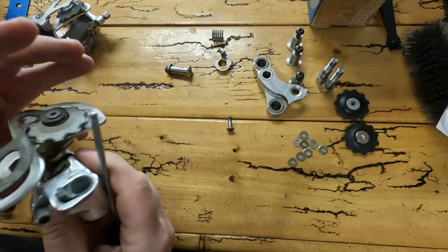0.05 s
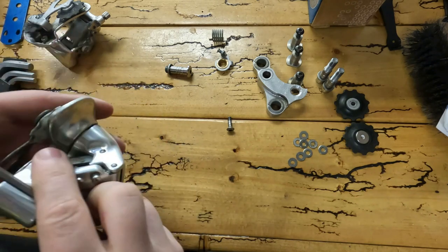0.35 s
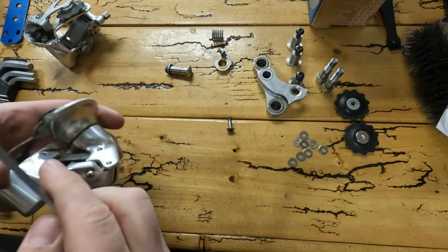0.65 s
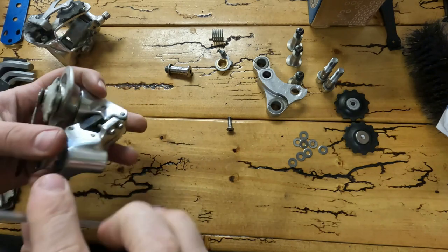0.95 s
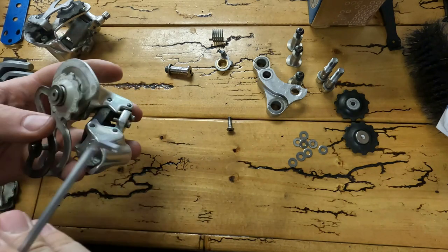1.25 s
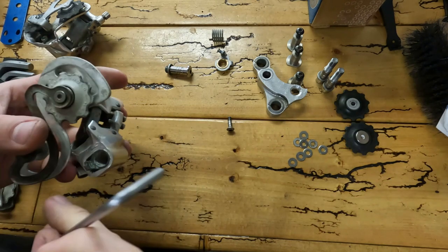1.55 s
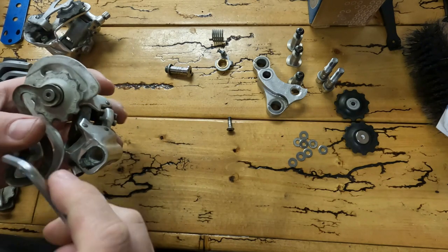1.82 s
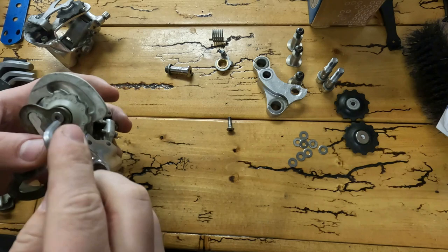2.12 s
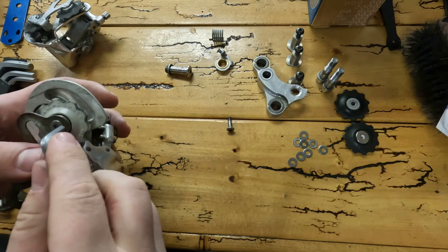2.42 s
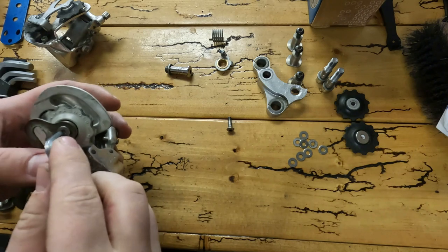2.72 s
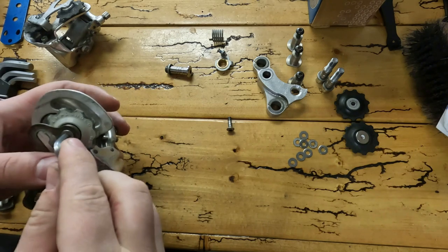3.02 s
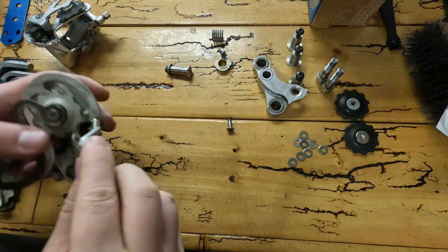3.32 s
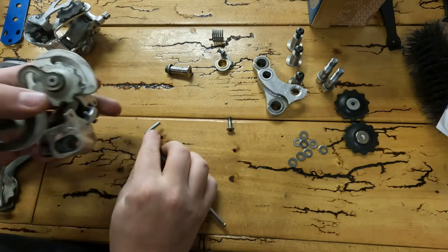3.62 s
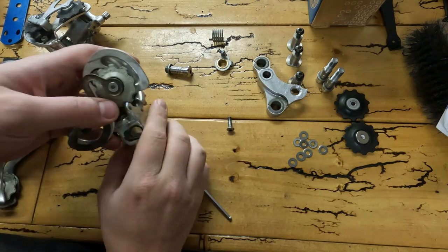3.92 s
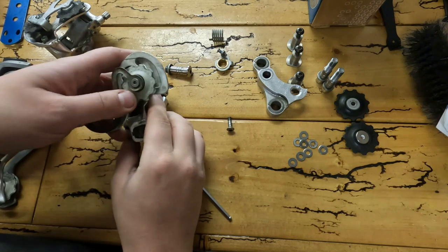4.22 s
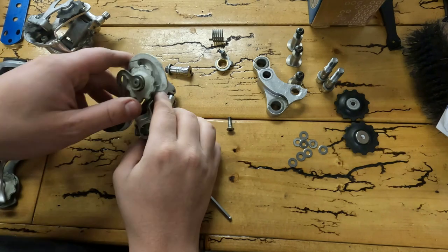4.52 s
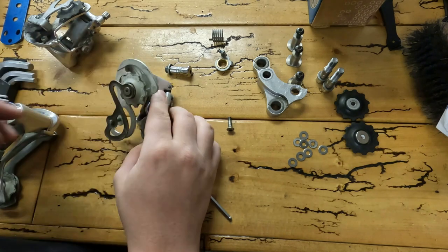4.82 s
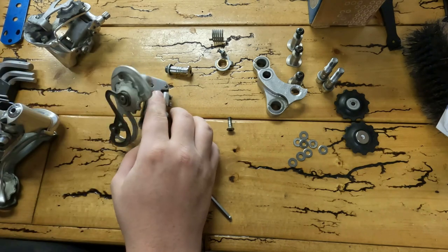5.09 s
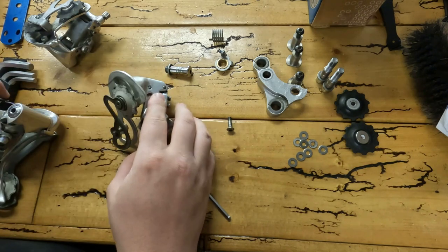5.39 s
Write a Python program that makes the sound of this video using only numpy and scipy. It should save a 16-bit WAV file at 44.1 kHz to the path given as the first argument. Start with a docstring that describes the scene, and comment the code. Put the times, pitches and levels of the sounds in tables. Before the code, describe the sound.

Small metal clicks from a hex key and bicycle part, then the key clatters onto a wooden bench and the part thumps down.

```python
"""Bicycle derailleur on a workbench

Close up in a small room, the sprung cage snaps against its stop and a hex key ticks and grates in a bolt.
The steel key knocks on the wooden bench, drops flat and rocks to rest, ringing. The derailleur thumps
down, skids and tips over, and the boards boom. Hands and sleeves rustle over a low room rumble."""
import sys
import numpy as np
from scipy import signal
from scipy.fft import rfft, irfft
from scipy.io import wavfile
from scipy.ndimage import uniform_filter1d

SR = 44100
rng = np.random.default_rng(int(sys.argv[2]) if len(sys.argv) > 2 else 0)


def dump_mix(stems):
    """Bounce the given channels to the path in sys.argv[1] as a 16-bit WAV at rate SR."""
    frames = np.atleast_2d(stems).T  # one column per channel
    limited = np.clip(frames, -1, 1)  # hard clip at full scale
    pcm = np.round(limited * 32767).astype(np.int16)
    wavfile.write(sys.argv[1], SR, pcm)


N = 244755
TIME = np.arange(N) / SR


def amp(db):
    """Decibels to gain."""
    return 10 ** (np.asarray(db) / 20)


def unit(x):
    """Scale to unit rms."""
    return x / np.sqrt(np.mean(x ** 2) + 1e-20)


def curve(points, hz):
    """Interpolate (freq_hz, value) rows on a log-frequency axis."""
    freq_hz, value = np.transpose(points)
    return np.interp(np.log(hz + 1), np.log(freq_hz + 1), value)


def stroke(rows, rise_share, fall_s):
    """Swell-hold-decay gain from (start_s, length_s, level_db) rows, summed in power."""
    power = np.zeros(N)
    for start_s, length_s, level_db in rows:
        attack = np.clip((TIME - start_s) / (rise_share * length_s), 0, 1)
        release = np.exp(-np.maximum(TIME - start_s - length_s, 0) / fall_s)
        power += (amp(level_db) * attack * release) ** 2
    return np.sqrt(power)


def fade_in(x, rise_s):
    """Exponential onset."""
    return x * (1 - np.exp(-TIME[:x.shape[-1]] / rise_s))


def add(mix, start_s, sound):
    """Mix a sound in at start_s."""
    part = mix[max(round(start_s * SR), 0):][:len(sound)]
    part += sound[:len(part)]


def convolve(x, response):
    """Filter by a mono or stereo response; one row per channel."""
    return signal.fftconvolve(np.atleast_2d(x), np.atleast_2d(response), axes=1)[:, :N]


def pan(x, left_db):
    """Set the left channel left_db above the right."""
    return x * amp([[left_db / 2], [-left_db / 2]])


def ports(x, spread):
    """Near reflections reach the two microphone ports differently, except in the bass."""
    t = TIME[:SR // 200]
    echoes = rng.standard_normal(len(t)) * np.exp(-t / 0.0018)
    phases = np.exp(1j * np.angle(rfft(echoes)))
    bass_cut = np.minimum(np.fft.rfftfreq(len(t), 1 / SR) / 1200, 1)
    side = spread * convolve(x, irfft(phases * bass_cut))[0]
    return np.array([x + side, x - side])


def click(spectrum, tilt_db_oct=0, size=2048):
    """Minimum-phase pulse of unit peak; its spectrum is tilted above 300 Hz."""
    hz = abs(np.fft.fftfreq(size, 1 / SR))
    log_gain = np.log(amp(curve(spectrum, hz) + tilt_db_oct * np.log2(np.maximum(hz, 300))))
    pulse = np.fft.ifft(np.exp(np.conj(signal.hilbert(log_gain)))).real[:size // 2]
    return pulse / abs(pulse).max()


def contact(spectrum, tilt_db_oct, rough, rough_s):
    """A click drawn out by micro-bounces of random sign."""
    t = TIME[:SR // 40]
    chatter = rng.choice([-1, 1], len(t)) * np.exp(-t / rough_s)
    force = rough * chatter / np.linalg.norm(chatter)
    force[0] = 1
    return signal.fftconvolve(force, click(spectrum, tilt_db_oct))


def ring(modes, pitch_ratio=1, scatter_db=0):
    """Decaying sines; their levels scatter with the spot struck."""
    t = TIME[:int(SR * max(t60_s for _, _, t60_s in modes))]
    offsets_db = scatter_db * rng.standard_normal(len(modes))
    return sum(amp(level_db + offset_db - 60 * t / t60_s) * np.sin(2 * np.pi * hz * pitch_ratio * t)
               for (hz, level_db, t60_s), offset_db in zip(modes, offsets_db))


def friction(spectrum, slips_per_s, spread_db):
    """Steady stream of tiny random slips, unit rms."""
    sizes = amp(spread_db * np.minimum(rng.exponential(1, N), 3))
    signs = rng.choice([-1, 1], N)
    slipping = rng.random(N) < slips_per_s / SR
    return unit(convolve(sizes * signs * slipping, click(spectrum))[0])


def bounces(runs, per_s, fade_db_per_s, scatter_db=1.5):
    """Yield (start_s, level_db) for each bounce of uneven, fading runs."""
    for start_s, length_s, level_db in runs:
        for k, (late, strong) in enumerate(rng.standard_normal((40, 2))):
            if k / per_s < length_s:
                faded_db = level_db - fade_db_per_s * k / per_s
                yield start_s + (k + 0.2 * late) / per_s, faded_db + scatter_db * strong


def tail(decay, colour, correlation, rise_s):
    """Diffuse stereo response of unit energy; each band decays at its own rate."""
    mid, side = rng.standard_normal((2, SR))
    side *= np.sqrt((1 - correlation) / (1 + correlation))
    hz, t, bands = signal.stft([mid + side, mid - side], SR, nperseg=256)
    bands *= amp(curve(colour, hz)[:, None] - 60 * t / curve(decay, hz)[:, None])
    response = fade_in(signal.istft(bands, SR, nperseg=256)[1][:, :SR], rise_s)
    return response / np.linalg.norm(response[0])


def room_noise():
    """Low room rumble under a faint hiss."""
    # noise shape: freq_hz, gain_db
    spectrum = [(12, -26), (22, -2), (36, -6), (50, -10.5), (68, -28.5), (125, -25), (170, -25.5),
                (220, -23), (300, -31), (600, -44), (1400, -47.5), (3600, -61), (12000, -64),
                (16000, -81.5)]
    # left-right likeness: freq_hz, correlation
    likeness = [(30, 0.9), (120, 0.89), (400, 0.82), (1500, 0.2), (5000, 0.13), (14000, 0.16)]
    hz = np.fft.rfftfreq(N, 1 / SR)
    left, independent = rfft(rng.standard_normal((2, N)))
    correlation = curve(likeness, hz)
    right = correlation * left + np.sqrt(1 - correlation ** 2) * independent
    noise = irfft(np.array([left, right]) * amp(curve(spectrum, hz)), N)
    return pan(amp(-47) * unit(noise), left_db=-1)


def room_echo(send):
    """Small-room reverberation; the treble dies first."""
    # reverberation time: freq_hz, t60_s
    decay = [(150, 0.59), (1000, 0.6), (3000, 0.6), (7000, 0.47), (14000, 0.24)]
    # echo colour: freq_hz, gain_db
    colour = [(100, 4), (1500, 4), (3000, -3.5), (7000, -3), (14000, 3)]
    return convolve(send, tail(decay, colour, correlation=0.41, rise_s=0.0082))


def bench_sway():
    """The bench sways with a deep rumble as the arms bear down on the key."""
    # pushes: start_s, length_s, level_db
    sways = [(2.41, 0.098, -39), (2.68, 0.13, -41), (3.18, 0.061, -39)]
    band = signal.butter(3, [18, 42], "bandpass", fs=SR, output="sos")
    rumble = unit(signal.sosfilt(band, rng.standard_normal(N)))
    return rumble * stroke(sways, rise_share=0.2, fall_s=0.055)


def cloth_squeaks():
    """Fine weave drawn over an edge sings a thin note that rises and falls with the arm's speed."""
    # squeaks: start_s, length_s, level_db, top_hz
    notes = [(1.02, .39, -67, 13100), (3.53, 0.41, -62, 12600)]
    out = np.zeros(N)
    for start_s, length_s, level_db, top_hz in notes:
        progress = np.clip((TIME - start_s) / length_s, 0, 1)
        wobble, jitter, catch = (unit(uniform_filter1d(rng.standard_normal(N), size))
                                 for size in (1500, 12, 1100))
        grip = np.maximum(0.87 + 0.45 * catch, 0)  # the note catches and lets go
        hz = top_hz * (1 - 0.1 * (2 * progress - 1) ** 2 + 0.012 * wobble + 0.015 * jitter)
        swell = np.sqrt(np.sin(np.pi * progress))
        out += amp(level_db) * grip * swell * np.sin(2 * np.pi * np.cumsum(hz) / SR)
    return out


def hands():
    """Soft friction: sleeves drag, a hand brushes the bench top, a forearm rubs its edge."""
    # sleeve drags: start_s, length_s, rustle_db, fizz_db
    drags = [(0.081, 0.15, -68, -90), (0.296, 0.092, -67, -82), (0.462, .12, -72.5, -80),
             (.57, 0.098, -64, -85), (0.707, 0.35, -63.5, -73), (1.032, 0.26, -60.5, -71),
             (1.313, 0.3, -82, -74.5), (1.736, 0.3, -67.5, -67), (2.023, .24, -57.5, -70),
             (2.396, 0.88, -80.5, -105), (3.149, 0.28, -61, -78), (3.703, 0.49, -55.5, -80),
             (4.312, 0.18, -62, -93), (4.414, 0.39, -63, -71.5), (4.769, 0.12, -54.5, -64),
             (4.975, 0.24, -64.5, -76)]
    # hand and forearm strokes: start_s, length_s, level_db
    brushes = [(3.38, .16, -51.5), (3.54, .16, -48)]
    rubs = [(1.2, 0.061, -66.5), (2.02, .16, -57)]
    # friction spectra: freq_hz, gain_db
    rustle_spectrum = [(200, -0.5), (800, -1.5), (1500, 0), (2400, -0.5), (3700, -3), (5200, 0), (7000, -2),
                       (9000, -13), (12500, -18.5), (14000, -24), (16000, -40.5)]
    fizz_spectrum = [(3500, -26), (5200, 0.5), (7000, -0.5), (8800, -6.5), (11000, -3), (12500, 0),
                     (14000, -2), (16000, -13.5)]
    brush_spectrum = [(300, -4), (1200, -3), (3500, 3.5), (6500, 0.5), (9000, -9.5), (12500, -15),
                      (15000, -31)]
    rub_spectrum = [(200, -15), (420, -1.5), (520, 2), (630, 6.5), (800, -4.5), (1100, -27), (2500, -40),
                    (6000, -26)]
    rustle = friction(rustle_spectrum, slips_per_s=9000, spread_db=0.5)
    rustle *= stroke(np.array(drags)[:, [0, 1, 2]], rise_share=0.28, fall_s=0.041)
    fizz = friction(fizz_spectrum, slips_per_s=8200, spread_db=3.5)
    fizz *= stroke(np.array(drags)[:, [0, 1, 3]], rise_share=0.28, fall_s=0.041)
    brush = friction(brush_spectrum, slips_per_s=12000, spread_db=0)
    brush *= stroke(brushes, rise_share=0.38, fall_s=0.058)
    rub = friction(rub_spectrum, slips_per_s=3000, spread_db=1)
    rub *= stroke(rubs, rise_share=0.25, fall_s=0.06)
    return pan(rustle + fizz + cloth_squeaks() + brush + rub, left_db=4)


def bench_thumps():
    """Each blow gives a wooden knock; the boards boom on and shake what lies on them."""
    # blows: start_s, knock_db, pitch_ratio, boom_db
    blows = [(0.241, -44, 1.75, -78), (3.651, -51, 0.92, -33.5), (3.827, -54, 0.9, -31.5),
             (3.911, -53, 0.91, -30.5), (3.985, -43, 1, -38), (4.029, -27, 1.17, -42),
             (4.066, -50, .7, -34), (4.4708, -23.5, 1.18, -8), (4.555, -21.5, 0.4, -30),
             (4.881, -45, 0.49, -32.5), (5.1253, -34, 3, -23), (5.262, -15, 1.06, -19.5),
             (5.3948, -20, 1.2, -35), (5.439, -28.5, 1.7, -62)]
    # modes of the struck spot and of the boards: freq_hz, gain_db, t60_s
    spot_modes = [(216.5, 3, 0.045), (313, 3.5, 0.038), (395, -7.5, 0.059)]
    board_modes = [(97, -7, .5), (120, -9, .4), (157, -6, .45), (218, 0, .55), (301, -1, .4), (372, 0, .45),
                   (437, -4, .4)]
    # force pulse: freq_hz, gain_db
    push_spectrum = [(30, -26.5), (90, -6), (200, 2.5), (370, 1), (480, -5), (650, -12), (900, -18.5),
                     (1200, -21), (1600, -26.5), (2600, -28.5), (5000, -41.5), (12000, -79)]
    # diffuse shaking: freq_hz, t60_s
    shake_decay = [(100, 0.67), (260, 0.91), (700, 0.89), (1840, 0.96), (5000, 0.32)]
    shake_colour = [(60, 7.5), (110, 3), (250, -13), (450, -1), (1000, 0), (5000, 1)]  # freq_hz, gain_db
    knock, push = np.zeros((2, N))
    for start_s, knock_db, pitch_ratio, boom_db in blows:
        wood = ring(spot_modes, np.clip(pitch_ratio, 0.6, 1.8))
        add(knock, start_s, amp(knock_db - 3) * fade_in(wood, rise_s=0.002))
        add(push, start_s, amp(boom_db) * click(push_spectrum))
    plank_swing = ring([(120.6, -21.5, 0.15)])  # a hand lands on one plank
    add(knock, 3.829, fade_in(plank_swing, rise_s=0.015))
    force = push + amp(-7.5) * knock
    boards = ring(board_modes)
    boom = convolve(force, boards / np.linalg.norm(boards))
    shake = convolve(force, tail(shake_decay, shake_colour, correlation=0.95, rise_s=0.00095))
    return knock + amp(1.5) * push + amp(-22) * boom + amp(-1.5) * shake


def cage_snap():
    """The sprung cage chatters against its stop; each rough contact rings its plates."""
    # contacts: start_s, level_db
    snaps = [(0.0299, -13.5), (0.0303, -18.5), (0.0373, -21), (0.039, -20), (0.049, -32)]
    # plate modes: freq_hz, gain_db, t60_s
    plate_modes = [(2075, -20, .035), (2298, -18, .045), (2500, -15, .04), (2621, -9, .035),
                   (2680, -2, .02), (3799, -12, .015), (4350, -14, .012), (5492, -17, .11),
                   (5720, -11, .02), (6000, -7, .025), (6780, -8, .02), (7100, -9, .02), (7796, -14, .04),
                   (7887, -14, .03), (11700, -17, .02), (12039, -12, .028)]
    # contact tick: freq_hz, gain_db
    tick_spectrum = [(200, -22), (1000, -28), (2200, 0.5), (3200, -2.5), (4200, -1.5), (7000, -4.5),
                     (10000, -21), (15000, -23.5)]
    force, t = np.zeros(N), TIME[:SR // 100]
    for start_s, level_db in snaps:
        buzz = rng.choice([-1, 1], len(t)) * np.exp(-t / 0.0027)
        add(force, start_s, amp(level_db) * ((t == 0) + 0.35 * buzz / np.linalg.norm(buzz)))
    plates = amp(-5.5) * convolve(force, ring(plate_modes))[0]
    ticks = amp(-2.5) * convolve(force, click(tick_spectrum))[0]
    low_cut = signal.butter(3, 1800, "highpass", fs=SR, output="sos")  # small plates radiate no bass
    return pan(ports(signal.sosfilt(low_cut, plates + ticks), spread=0.25), left_db=2)


def key_in_bolt():
    """The hex key takes up its play in the socket, grates and slips out."""
    # turning and withdrawal: start_s, length_s, level_db
    grates = [(2.595, 0.024, -56), (2.66, 0.06, -56), (2.89, 0.041, -59), (3.38, 0.023, -34)]
    # ticks in the bolt head: start_s, level_db, tilt_db_oct
    ticks = [(1.722, -55.5, -12), (2.5459, -24.5, 3), (2.5462, -24.5, 8), (2.6, -46.5, -5),
             (2.7092, -52, -4), (2.897, -47, 2), (2.933, -51.5, -18), (3.379, -30, 5.5), (3.391, -27, 3),
             (3.3969, -18, -1), (3.4058, -23.5, 9.5)]
    # grate and tick spectra: freq_hz, gain_db
    grate_spectrum = [(500, -28), (1500, -17), (2200, -15), (2650, -4.5), (3300, -10), (4200, 6.5),
                      (5200, -5.5), (6500, -1.5), (8500, -20.5), (12000, -21), (15000, -22.5)]
    tick_spectrum = [(300, -41), (1000, -21.5), (1600, -9), (2200, -17), (2700, -0.5), (3400, -12.5),
                     (4200, 4), (5200, -4), (6500, -2), (8500, -16.5), (12000, -28), (15500, -40)]
    out = friction(grate_spectrum, slips_per_s=2400, spread_db=3.5)
    out *= stroke(grates, rise_share=0.47, fall_s=0.0074)
    for start_s, level_db, tilt_db_oct in ticks:
        add(out, start_s, amp(level_db) * contact(tick_spectrum, tilt_db_oct, rough=1.84, rough_s=0.001))
    return pan(ports(out, spread=0.25), left_db=-2)


def key_ring():
    """The steel key rings freely."""
    # free modes: freq_hz, gain_db, t60_s
    steel_modes = [(7817, -3, .6), (8387, -3, .3), (8877, -16, .2), (11440, -12, .28), (12032, -12, .28),
                   (12559, -20, .25), (15480, -23, .35)]
    return ring(steel_modes)


def key_knocks():
    """The held key bounces on its end; each knock is short and pitched, and the steel sings on."""
    # knocks on the boards: start_s, level_db, pitch_ratio, ring_db
    knocks = [(3.6477, -18.5, 1.02, -68), (3.6919, -30, 0.87, -70), (3.7158, -33, 0.83, -73.5),
              (3.827, -13.5, 1.024, -37), (3.8692, -17, 1.01, -39.5), (3.8959, -16, 1, -45.5),
              (3.9161, -22, 1.2, -50.5), (3.9504, -18, 1.1, -53)]
    # knock modes: freq_hz, gain_db, t60_s
    knock_modes = [(3170, 0, .015), (3320, -7, .01), (3640, -7, .011), (5100, -16, .008), (1750, -17, .015)]
    # dry crack of the wood: freq_hz, gain_db
    crack_spectrum = [(150, -8.5), (700, -12.5), (1500, 6), (2400, -10), (3300, -13), (5000, -5),
                      (7000, -20), (9500, -27), (12500, -18), (15000, -47)]
    held_hz, held_t60_s, release_s = 5448, 0.45, 3.911
    out, held = np.zeros((2, N))
    for start_s, level_db, pitch_ratio, ring_db in knocks:
        add(out, start_s, amp(level_db) * ring(knock_modes, pitch_ratio, scatter_db=1))
        add(out, start_s, amp(level_db - 14) * contact(crack_spectrum, 0, rough=3.8, rough_s=0.008))
        add(out, start_s, amp(ring_db - 13) * key_ring())
        add(held, start_s, amp(ring_db) * ring([(held_hz, 0, held_t60_s)]))
    held *= np.exp(-np.maximum(TIME - release_s, 0) / 0.008)  # wood damps this mode once the key is flat
    return pan(ports(out + held, spread=0.38), left_db=-0.5)


def key_clatter():
    """The released key drops flat, skids and rocks from end to end, ringing."""
    # main clacks: start_s, level_db, tilt_db_oct, ring_db
    clacks = [(3.9108, -6.5, 6.5, -40), (3.915, -24, -7.5, -62), (3.9233, -32.5, 3, -54.5),
              (3.9425, -18.5, 4.5, -54), (3.9505, -19, 4, -34), (3.9668, -14.5, 4, -67),
              (3.985, -13, 3.5, -38.5), (3.994, -26, 8, -39), (4.0143, -18, 1, -42.5),
              (4.018, -21, -3.5, -66), (4.0314, -18.5, 4, -40), (4.0483, -29, -1, -65),
              (4.0969, -25.5, -1, -59)]
    # rocking and skidding: start_s, length_s, level_db
    rocking = [(3.977, .11, -22)]
    skids = [(3.808, 0.038, -38.5), (3.965, 0.079, -32)]
    # key on wood: freq_hz, gain_db
    spectrum = [(100, -11), (300, -6), (750, -7.5), (1300, 4.5), (2000, -3.5), (2600, 4), (3600, 2),
                (5000, -0.5), (6500, -5.5), (8500, -21), (10500, -23), (13000, -32.5), (15500, -28.5)]
    # resonances of steel lying on the plank: freq_hz, gain_db, t60_s
    plank_modes = [(1264, -1, 0.048), (2470, -3.5, 0.16), (3240, -9, 0.041), (3550, -5.5, 0.065),
                   (3650, 2.5, 0.075), (3820, -10, 0.024), (4900, -2.5, .04), (5830, -11.5, .03)]
    rock_tilt_db_oct, rock_ring_db = 7, -61
    rocks = [(start_s, level_db, rock_tilt_db_oct, rock_ring_db)
             for start_s, level_db in bounces(rocking, per_s=100, fade_db_per_s=55)]
    out, steel = np.zeros((2, N))
    for start_s, level_db, tilt_db_oct, ring_db in clacks + rocks:
        add(out, start_s, amp(level_db) * contact(spectrum, tilt_db_oct, rough=2.27, rough_s=0.0018))
        add(out, start_s, amp(level_db - 23.5) * ring(plank_modes, scatter_db=5.5))
        add(steel, start_s, amp(ring_db) * key_ring())
    scrape = friction(spectrum, slips_per_s=400, spread_db=0.5)
    out += scrape * stroke(skids, rise_share=0.34, fall_s=0.053)
    return pan(ports(out, spread=0.12), left_db=1) + pan(steel, left_db=0.5)


def derailleur():
    """The body touches down, skids, judders and tips over; its loose links ring briefly."""
    # links hitting the boards: start_s, level_db, tilt_db_oct
    clacks = [(4.4688, -21.5, -4.5), (5.1238, -27, 2.5), (5.1326, -26, -3), (5.143, -21.5, 1),
              (5.157, -18, 2), (5.2037, -27, 1.5), (5.2557, -24, 2.5), (5.2604, -17.5, 0.5),
              (5.2931, -22, -7), (5.394, -33, -9), (5.47, -42, -9.5)]
    # skidding and juddering: start_s, length_s, level_db
    skids = [(4.355, 0.0095, -55.5), (5.135, 0.033, -34), (5.25, 0.019, -39)]
    juddering = [(5.167, .034, -25), (5.274, .03, -30.5)]
    # body on wood: freq_hz, gain_db
    spectrum = [(100, -17), (300, -8), (750, -21.5), (1050, 1.5), (1350, 3), (1700, -2), (2100, -4.5),
                (2600, -2), (3400, -0.5), (4400, -6.5), (6500, -13.5), (9000, -26), (12500, -35),
                (15000, -49)]
    # link modes: freq_hz, gain_db, t60_s
    link_modes = [(1222, -1.5, 0.074), (1289, 2.5, 0.089), (1360, -22, 0.046), (1625, -7, 0.046),
                  (2510, 5, 0.049), (3197, -1.5, 0.033)]
    out = friction(spectrum, slips_per_s=900, spread_db=0) * stroke(skids, rise_share=0.3, fall_s=0.019)
    judder_tilt_db_oct = 2.5
    judders = [(start_s, level_db, judder_tilt_db_oct)
               for start_s, level_db in bounces(juddering, per_s=130, fade_db_per_s=54)]
    for start_s, level_db, tilt_db_oct in clacks + judders:
        add(out, start_s, amp(level_db) * contact(spectrum, tilt_db_oct, rough=2.21, rough_s=0.0032))
        add(out, start_s, amp(level_db - 19.5) * ring(link_modes, scatter_db=4))
    return pan(ports(out, spread=0.24), left_db=1)


def scene():
    """Metal in the hands is close and dry; metal on the bench stirs the room more."""
    in_hand = cage_snap() + key_in_bolt()
    on_bench = key_knocks() + key_clatter() + derailleur()
    rustle = hands()
    echo = room_echo(amp(-17) * in_hand + amp(-9.5) * on_bench + amp(-6.5) * rustle)
    return in_hand + on_bench + rustle + bench_thumps() + echo + bench_sway() + room_noise()


def record(dry):
    """The left port hears more high treble than the right; both fade above it, then are band-limited."""
    hz = np.fft.rfftfreq(N, 1 / SR)
    left_db = curve([(2000, -0.5), (5000, 0.3), (8000, 1.2), (12000, 5.5)], hz)
    top_db = curve([(12500, 0.5), (14000, -11.5), (16000, -11)], hz)
    ported = irfft(rfft(dry) * amp([top_db + left_db / 2, top_db - left_db / 2]), N)
    band_limit = signal.firwin(511, cutoff=15800, window=("kaiser", 9), fs=SR)
    return signal.oaconvolve(ported, band_limit[None], "same")


dry = scene()
out = record(dry)
dump_mix(out)
```